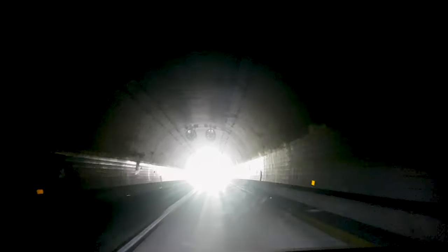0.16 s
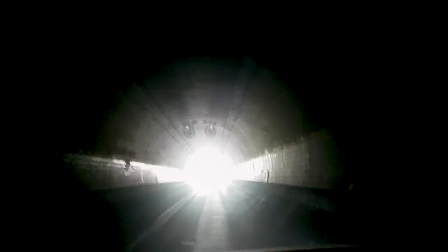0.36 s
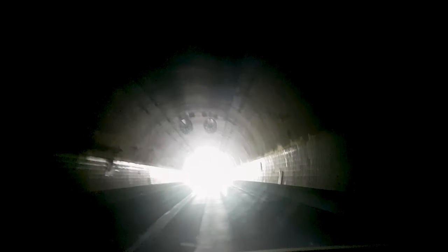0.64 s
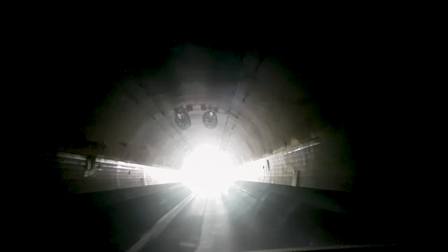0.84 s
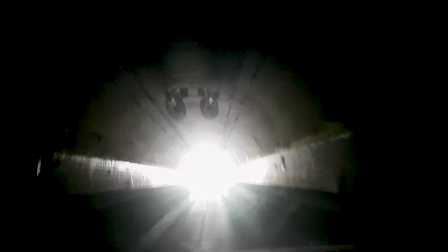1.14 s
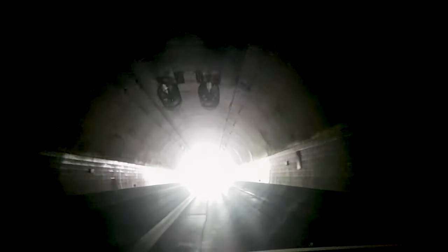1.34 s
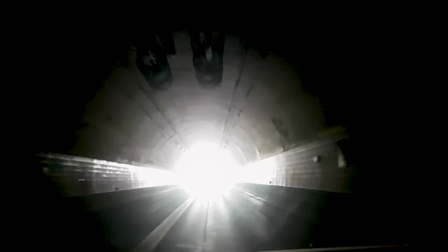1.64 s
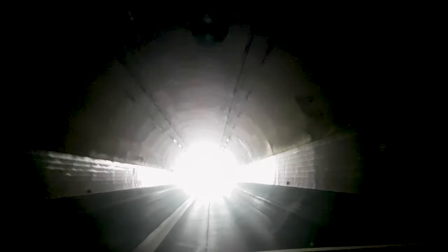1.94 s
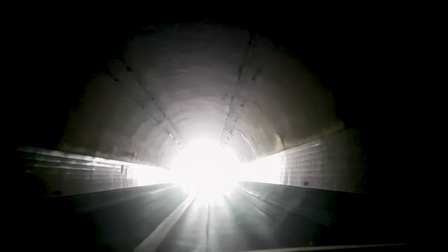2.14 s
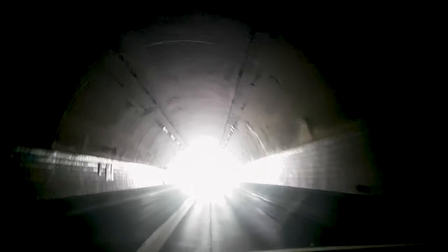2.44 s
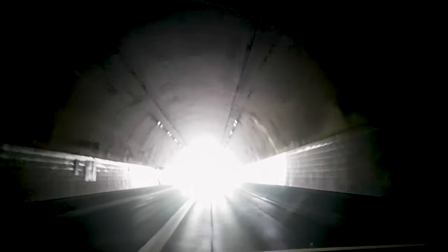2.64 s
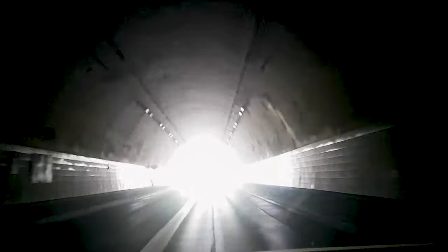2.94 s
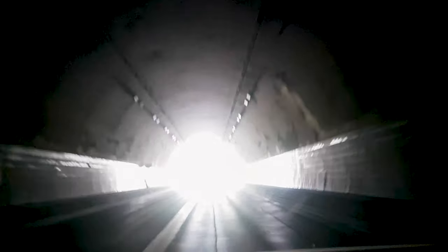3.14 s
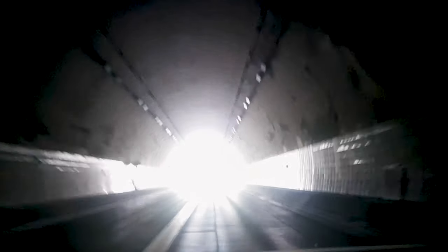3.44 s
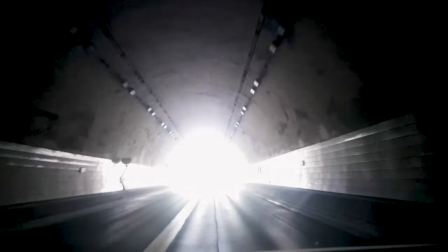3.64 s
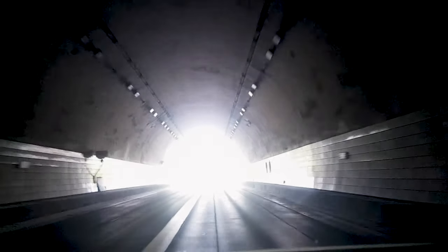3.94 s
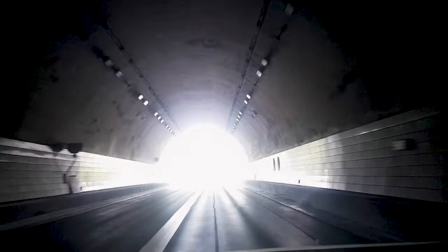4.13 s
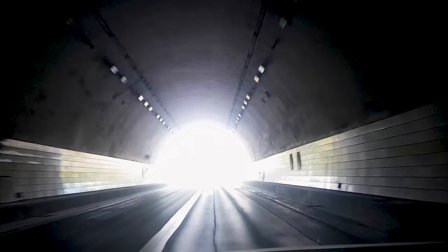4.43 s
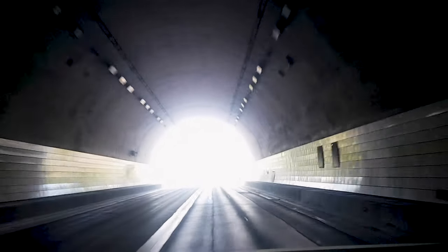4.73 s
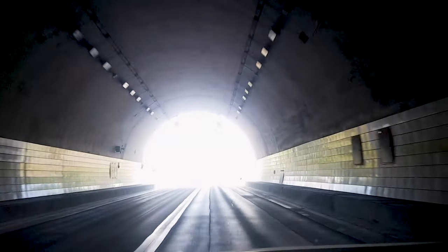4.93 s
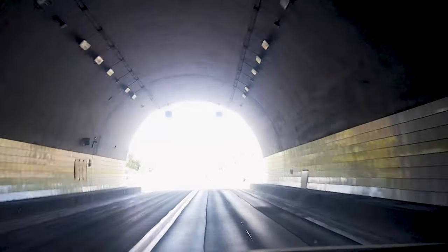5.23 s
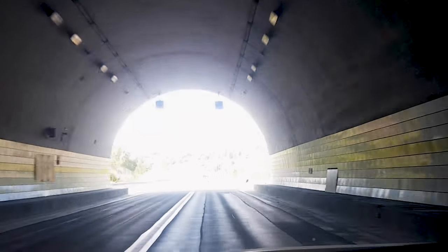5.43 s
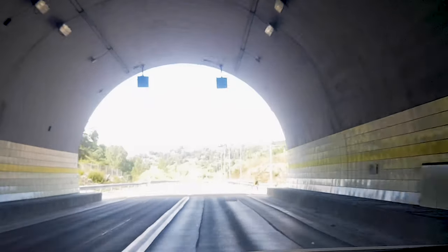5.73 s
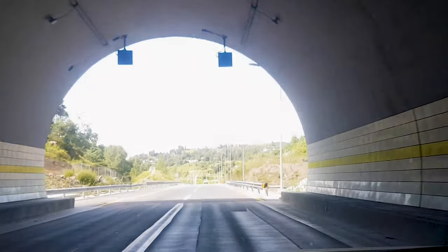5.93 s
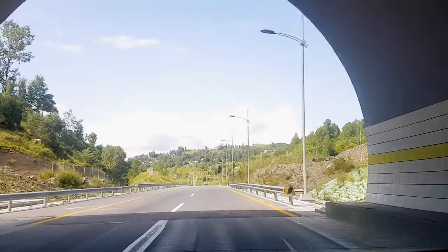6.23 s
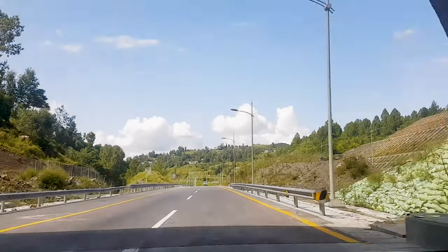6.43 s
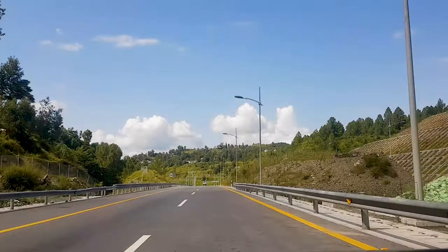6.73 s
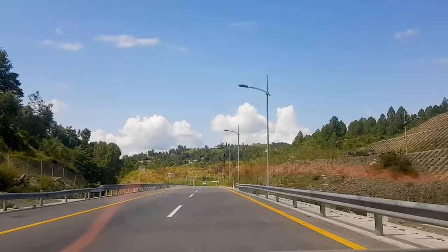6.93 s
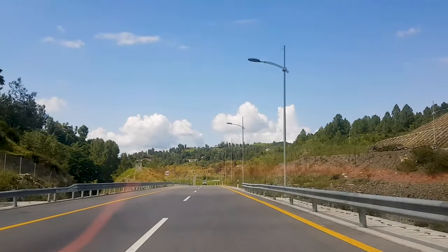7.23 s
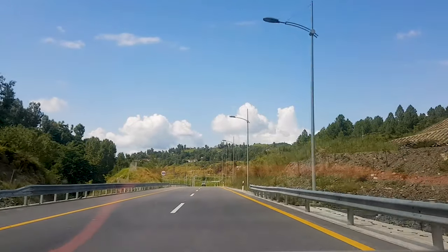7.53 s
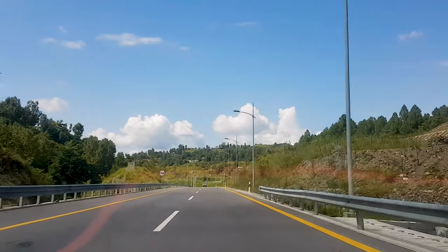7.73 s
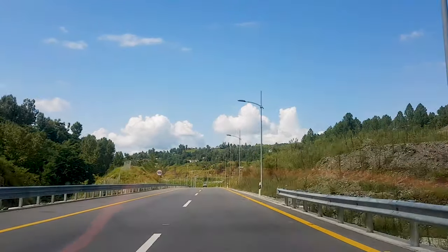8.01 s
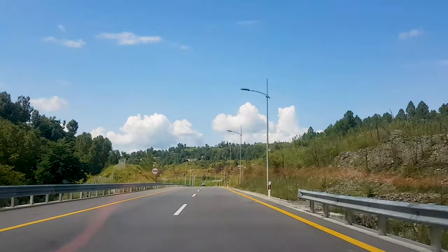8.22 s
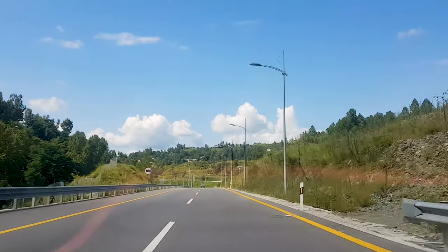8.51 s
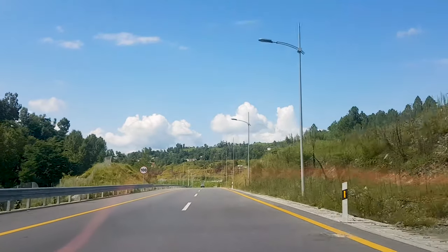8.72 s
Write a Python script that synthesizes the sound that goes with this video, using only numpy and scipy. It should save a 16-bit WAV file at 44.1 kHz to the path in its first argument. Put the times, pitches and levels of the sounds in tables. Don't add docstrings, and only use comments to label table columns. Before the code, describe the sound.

Stereo microphone in a moving car, dull on the left and wind-exposed on the right. After a clicked cut from a droning roar, low road rumble mixes with blurred tyre tones, faint drivetrain hum and high whine. Buffeting grows into hard slaps mid-way. At the tunnel exit the hollow echo vanishes, leaving drier, rougher road noise and a few late gusts.

```python
import sys
import numpy as np
from scipy import signal
from scipy.fft import rfft, irfft, next_fast_len
from scipy.io import wavfile
from scipy.ndimage import uniform_filter1d, minimum_filter1d, map_coordinates

SR = 44100
rng = np.random.default_rng(int(sys.argv[2]) if len(sys.argv) > 2 else 0)


def inscribe(sig):
    pcm = np.round(np.clip(np.atleast_2d(sig).T, -1, 1) * 32767)
    wavfile.write(sys.argv[1], SR, pcm.astype(np.int16))


def makeup_ratio(level_db):
    decades = np.asarray(level_db, float) / 20
    return 10 ** decades


N = 391166


def clock():
    return np.arange(N) / SR


def unit(x):
    return x / np.sqrt(np.mean(x ** 2) + 1e-20)


def along(points, hz):
    f, v = np.transpose(points)
    return np.interp(np.log(hz + 1), np.log(f + 1), v)


def track(rows):
    s, value = np.transpose(rows)
    return np.interp(clock(), s, value)


def humps(rows):
    return sum(height * np.exp(-((clock() - s) / half) ** 2) for s, half, height in rows)


def swells(rows, rest_db):
    return makeup_ratio(rest_db) + humps([(s, half, makeup_ratio(db)) for s, half, db in rows])


def wobble(rate):
    coarse = np.arange(0, N + 32, 32)
    knots = rng.standard_normal(int(N * rate / SR) + 6)
    return np.interp(np.arange(N), coarse, map_coordinates(knots, [coarse * rate / SR]))


def filtered(x, response):
    m = next_fast_len(N + 8192)
    return irfft(rfft(x, m) * response(np.fft.rfftfreq(m, 1 / SR)), m)[..., :N]


def rush(spectrum, patchy_db):
    z = signal.stft(rng.standard_normal((2, N)), nperseg=512)[2]
    field = uniform_filter1d(rng.standard_normal(z.shape[1:]), size=6, axis=0)
    field = uniform_filter1d(field, size=12, axis=1)
    pair = signal.istft(z * makeup_ratio(patchy_db * unit(field)), nperseg=512)[1][:, :N]
    lowest, highest = spectrum[0][0], spectrum[-1][0]
    edge = [(lowest * .6, -140)] + list(spectrum) + [(highest * 1.6, -150)]
    top = max(db for _, db in spectrum)
    return unit(filtered(pair, lambda hz: makeup_ratio(along(edge, hz) - min(top, 0))))


def tone(hz, rough, blur_hz):
    turn = np.exp(2j * np.pi * np.cumsum(hz) / SR)
    paths = []
    for share in np.clip([rough, 3 * rough], 0, 1):
        scatter = wobble(blur_hz) + 1j * wobble(blur_hz)
        paths.append(np.sqrt(1 - share) + np.sqrt(share / 2) * scatter)
    return np.sqrt(2) * np.real(np.array(paths) * turn)


# (frequency [Hz], level [dB per Hz])
HISS = [(4000, -4), (5500, -6), (7500, -10), (9500, -4), (11500, -2), (13000, 5), (15700, 3)]


def electronics():
    return makeup_ratio(-88.5) * rush(HISS, patchy_db=.3)


# (frequency [Hz], level [dB per Hz])
DEEP_ROAR = [(40, -25), (100, -13), (160, -9), (320, -14), (720, -25), (1600, -25), (4300, -36),
             (4900, -50), (8000, -70)]
# (multiple of the drone pitch, level [dB])
LORRY = [(1, -27.5), (2, -30), (3, -31), (4, -27.5)]
DRONE_HZ = 156.2


def deeper():
    lines = sum(makeup_ratio(db) * np.sin(2 * np.pi * k * DRONE_HZ * clock() + k * k) for k, db in LORRY)
    return makeup_ratio(-29) * rush(DEEP_ROAR, patchy_db=1.2) + lines


# (centre [s], half length [s], level [dB])
GEAR_PULLS = [
    (.3, .3, -44),
    (1.3, 0.46, -36),
    (1.95, .35, -34),
    (2.7, 0.4, -39.5),
    (3.5, 0.23, -42),
    (5.2, .5, -42.5),
    (6, 0.33, -38.5),
    (6.9, 0.57, -37.5),
]
# (centre [s], half length [s], level [dB])
OVERTONE_PULLS = [
    (.5, .2, -50),
    (1.15, 0.44, -43),
    (2.1, .5, -48.5),
    (3.1, 0.36, -38.5),
    (5.4, 0.4, -50),
    (6.3, .4, -49),
]
# (centre [s], half length [s], level [dB])
AXLE_PULLS = [
    (.35, .5, -40),
    (1.35, 0.52, -49),
    (2.6, 0.35, -43),
    (5.1, .5, -50),
]
GEAR_HZ, AXLE_HZ = (327, 1.53), (413, 3.2)  # (pitch at the start [Hz], climb [Hz per s])


def driveline():
    gear_hz, axle_hz = (start + climb * clock() for start, climb in (GEAR_HZ, AXLE_HZ))
    gear = swells(GEAR_PULLS, -70) * tone(gear_hz, rough=.08, blur_hz=9)
    overtone = swells(OVERTONE_PULLS, -70) * tone(2 * gear_hz, rough=.25, blur_hz=6)
    axle = swells(AXLE_PULLS, -56) * tone(axle_hz, rough=.25, blur_hz=6)
    return gear + overtone + axle


# (frequency [Hz], level [dB per Hz])
ROAD = [(15, -57.5), (40, -45.5), (70, -42), (105, -48), (140, -45.5), (170, -52), (200, -50.5), (300, -56),
        (500, -65), (800, -64), (1300, -69.5), (2000, -73.5), (3500, -92.5), (7000, -104.5)]
# (centre [s], half length [s], added level [dB])
PATCHES = [
    (.15, .2, 1),
    (1.2, 0.18, 1.5),
    (2.2, 0.18, 0.5),
    (4.3, 0.17, 2.5),
    (5, .2, 2.5),
    (5.8, .3, 2.5),
    (6.8, 0.22, 1),
    (8.2, 0.18, 1.5),
]
RUMBLE_DB, BRIGHT_DB, HUM_DB = -28, -23, -45.5
COARSE_S, COARSE_DB = 7.5, 3


def road():
    outside = 1 / (1 + np.exp((COARSE_S - clock()) / .1))
    noise = rush(ROAD, patchy_db=0.63)
    low = filtered(noise, lambda hz: 1 / (1 + (hz / 300) ** 4))
    rumble = makeup_ratio(RUMBLE_DB + COARSE_DB * outside + humps(PATCHES)) * low
    hum = makeup_ratio(HUM_DB) * outside * tone(np.full(N, 765), rough=1, blur_hz=45)
    return rumble + makeup_ratio(BRIGHT_DB) * (noise - low) + hum


PORTAL_S, CUT_S, CUT_DB, TRAIL_DB_PER_S = 6.85, .2, 17, 8


def walls_db():
    past = np.maximum(clock() - PORTAL_S, 0)
    return -CUT_DB * np.minimum(past / CUT_S, 1) - TRAIL_DB_PER_S * past


# (frequency [Hz], level [dB per Hz])
TUBE = [(250, -70.5), (400, -67.5), (600, -74), (900, -59.5), (1050, -64), (1250, -78.5), (1700, -67.5),
        (2100, -68.5), (2600, -73.5), (2950, -78), (3300, -82), (4600, -87), (7000, -101), (9000, -120.5)]
# (time [s], frequency [Hz])
TREAD_HZ = [(0, 970), (1.8, 974), (3.6, 969), (5.4, 974), (6.8, 985)]
# (centre [s], half length [s], level [dB])
TREAD_SWELLS = [(.1, 0.079, -34.5), (.6, .15, -41.5), (1.6, 0.12, -38.5), (2.15, .3, -33), (2.8, 0.36, -40),
                (3.6, 0.32, -38.5), (4.2, 0.12, -37.5), (4.7, 0.2, -43.5), (5.65, 0.34, -39.5),
                (6.02, 0.02, -37), (6.6, .15, -38)]
# (time [s], frequency [Hz])
WHINE_HZ = [(0, 2409), (1.5, 2410), (4, 2375), (4.8, 2338), (5.3, 2323), (6.3, 2323), (6.8, 2332)]
# (centre [s], half length [s], added level [dB])
GLINTS = [(.15, 0.16, 3.5), (.52, 0.047, 7), (1.3, 0.068, 5), (1.68, 0.081, 4.5), (2.4, 0.14, 0.5),
          (2.87, 0.075, 6.5), (3.9, 0.067, 6), (4.4, .1, 4), (4.75, .15, 4), (5.3, 0.14, 5),
          (6.4, 0.23, 0.5)]
ROAR_DB, TREAD_DB = -33.5, -36.5
WHINE_DB, NEAREST_S, RECEDE_DB_PER_S = -41, 1.9, 3


def tunnel():
    roar = makeup_ratio(ROAR_DB + 0.22 * wobble(7)) * rush(TUBE, patchy_db=0.6)
    tread_hz = track(TREAD_HZ)
    tread = tone(tread_hz, rough=.4, blur_hz=48)
    octave = makeup_ratio(-12.5) * tone(2 * tread_hz, rough=.9, blur_hz=60)
    near = makeup_ratio(WHINE_DB - RECEDE_DB_PER_S * np.abs(clock() - NEAREST_S) + humps(GLINTS))
    whine = near * tone(track(WHINE_HZ), rough=.5, blur_hz=36)
    return makeup_ratio(walls_db()) * (roar + swells(TREAD_SWELLS, TREAD_DB) * (tread + octave) + whine)


# (frequency [Hz], level [dB per Hz])
AIR = [(8000, -27.5), (9500, -5), (11500, 2), (13000, 2.5), (15700, 0)]
AIR_DB, RUSH_DB, LULL_DB, LULL_S = -78, 2.5, 11, .3


def air():
    past = clock() - PORTAL_S
    change_db = np.where(past < 0, RUSH_DB, -LULL_DB)
    fade_s = np.where(past < 0, 1.5, LULL_S)
    air_db = AIR_DB + change_db * np.exp(-np.abs(past) / fade_s)
    return makeup_ratio(air_db + .5 * wobble(12)) * rush(AIR, patchy_db=.4)[0]


# (frequency [Hz], level [dB per Hz])
TURBULENCE = [(20, -31.5), (45, -14.5), (70, 1), (110, 3), (200, -1), (350, -11), (550, -21), (900, -25.5),
              (2000, -59), (5000, -100)]
# (centre [s], half length [s], level [dB])
GUSTS = [(.35, 0.26, -29.5), (.71, 0.076, -26.5), (1.12, 0.16, -28.5), (1.35, 0.059, -24),
         (1.6, 0.18, -28.5), (2.14, 0.066, -30.5), (2.8, 0.067, -29), (3.12, 0.035, -21),
         (3.57, 0.14, -20.5), (3.87, 0.098, -28), (4.2, 0.097, -24.5), (4.42, 0.17, -18),
         (4.79, 0.052, -20.5), (5.16, .16, -21), (5.815, 0.05, -16.5), (6.22, 0.22, -30.5),
         (6.63, 0.12, -24), (6.85, .08, -20), (7.13, 0.11, -18.5), (8.48, .08, -22), (8.67, 0.041, -17.5)]
# (time [s], peak level [dB], frequency [Hz])
SLAPS = [(3.111, -4, 130), (3.133, -3.5, 149), (3.466, -11.5, 605), (3.526, -16, 650), (3.603, -19, 900),
         (3.626, -11, 300), (4.302, -11, 243), (4.356, -4.5, 488), (4.372, -9, 506), (4.538, -11.5, 249),
         (6.87, -8, 350), (6.891, -13, 250), (7.088, -16, 300), (7.105, -14, 380), (4.411, -14, 300),
         (4.458, -13, 500), (5.013, -18, 700), (5.778, -20, 620), (5.823, -14, 300), (5.8248, -11, 900),
         (5.836, 0, 458), (5.853, -14.5, 550), (6.663, -17, 650), (7.053, -16, 400), (8.497, -15, 400),
         (8.499, -12, 750), (8.501, -10.5, 1360), (8.513, -10.5, 600), (8.522, -12, 400),
         (8.521, -20, 1300)]
BREEZE_DB = -34.5
SKEW = 1.2
RECOIL, RECOIL_S = 0.15, .0025


def wind():
    lumps = makeup_ratio(3.1 * wobble(45) + 3.0 * wobble(160))
    push = unit(filtered(lumps * rng.standard_normal(N), lambda hz: makeup_ratio(along(TURBULENCE, hz))))
    push = swells(GUSTS, BREEZE_DB) * push
    push = push + SKEW * push ** 2
    t = np.arange(-600, 600) / SR
    back = RECOIL * np.exp(-2 * (t / RECOIL_S - 1) ** 2)
    for s, db, hz in SLAPS:
        u = (np.pi * hz * t) ** 2
        slap = (1 - 2 * u) * np.exp(-u) - back
        push[round(s * SR) - 600:][:len(t)] += makeup_ratio(db) * slap
    limited = .33 * np.tanh(push / .33)
    return filtered(limited, lambda hz: hz ** 2 / (hz ** 2 + 40 ** 2) / (1 + (hz / 4200) ** 6))


# (frequency [Hz], level [dB])
SHADE = [(40, 2), (110, -2.5), (200, 2.5), (300, -7.5), (500, -7), (900, -10), (1300, -13.5), (2000, -17),
         (3000, -24), (4000, -29.5), (5000, -35.5), (8000, -39.5)]
# (frequency [Hz], likeness [0-1])
ALIKE = [(30, .96), (70, .88), (105, .45), (140, .9), (220, .8), (450, .6), (600, .15), (950, .75),
         (1100, .4), (1400, .75), (2200, .3), (5000, .15)]
# (frequency [Hz], phase [radians])
LEAD = [(20, -.2), (200, -.45), (520, -1), (700, -3), (1000, -4.2), (1800, -4.3), (2100, -3.1),
        (2700, -1.2), (3100, -4.3)]


def ports(pair):
    def left(hz):
        alike = np.clip(along(ALIKE, hz), 0, 1)
        shares = np.array([alike, np.sqrt(1 - alike ** 2)])
        return makeup_ratio(along(SHADE, hz)) * np.exp(1j * along(LEAD, hz)) * shares
    return np.array([filtered(pair, left).sum(axis=0), pair[0]])


# (centre [s], half length [s], depth [dB])
DUCKS = [
    (1.35, .12, -1.5),
    (3.82, 0.12, 3.5),
    (4.01, .1, 4),
    (4.4, 0.18, 1.5),
    (5.86, 0.11, 2.5),
    (6.9, 0.19, -0.5),
    (8.52, 0.22, 1),
]


def gain_control(x):
    x = x * makeup_ratio(0.24 - humps(DUCKS))
    need = np.minimum(1, .25 / (np.abs(x).max(axis=0) + 1e-9)) ** .6
    return x * uniform_filter1d(minimum_filter1d(need, size=1300), size=1000)


CHANGE = 2558


def scene():
    after = np.clip((np.arange(N) - CHANGE) / 150 + .5, 0, 1)
    field = after * (driveline() + road() + tunnel()) + (1 - after) * deeper()
    t = np.maximum(np.arange(N) - CHANGE, 0)
    jump = (t > 0) * np.exp(-t / 15) * makeup_ratio([[-25], [-20]])
    return ports(field) + jump + [[0], [1]] * (air() + wind())


def roll_off(x):
    return signal.sosfilt(signal.butter(12, 15730, fs=SR, output="sos"), x)


def record(dry):
    x = gain_control(dry + electronics())
    x = filtered(x, lambda hz: hz < 15730)
    return roll_off(x)


dry = scene()
out = record(dry)
inscribe(out)
```